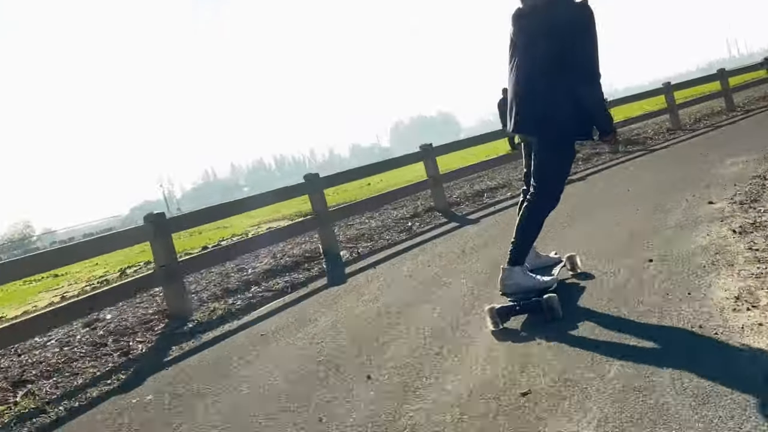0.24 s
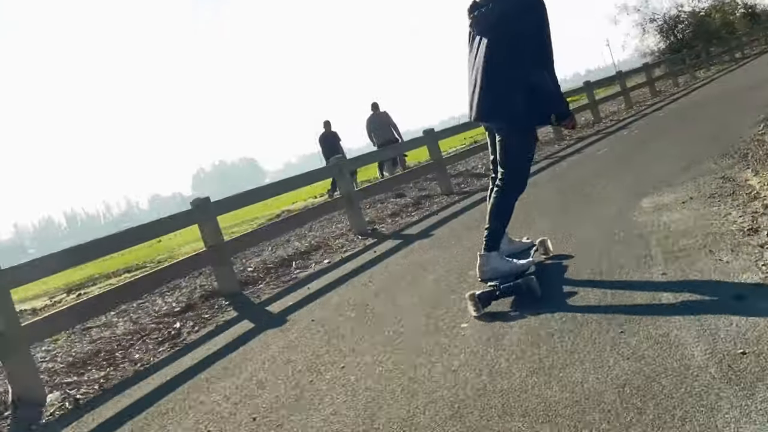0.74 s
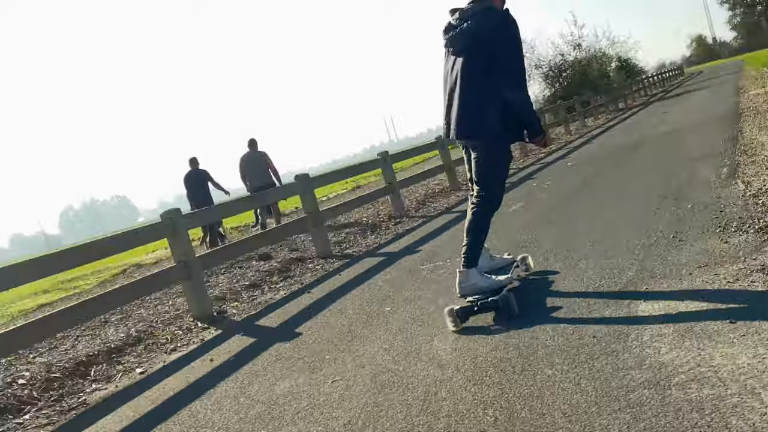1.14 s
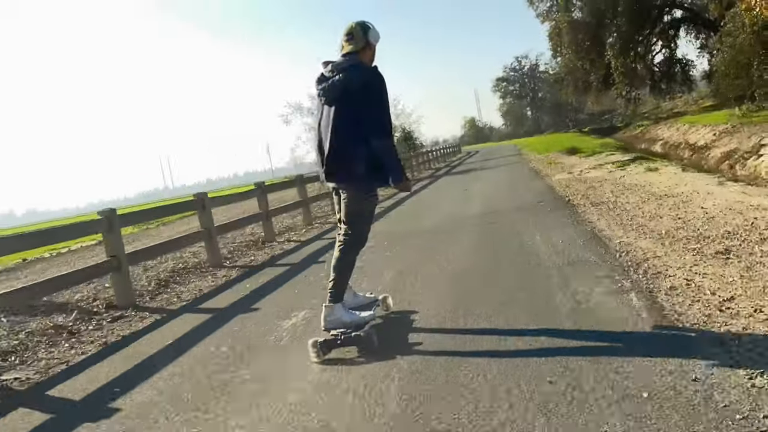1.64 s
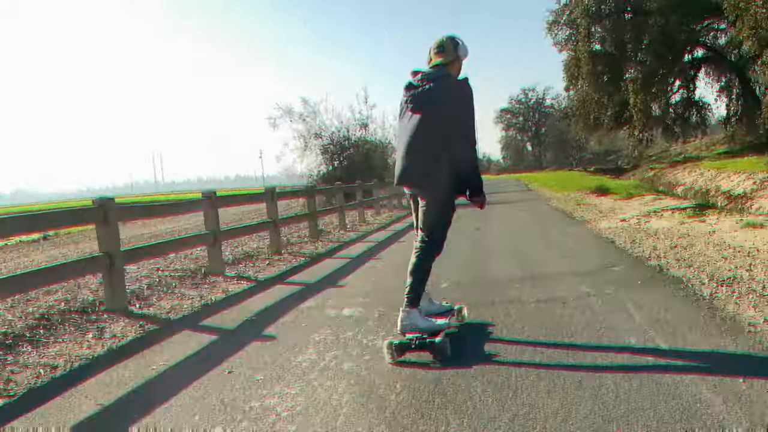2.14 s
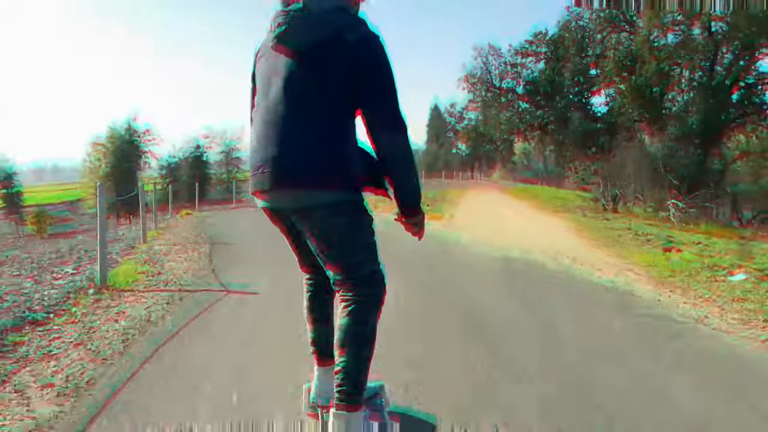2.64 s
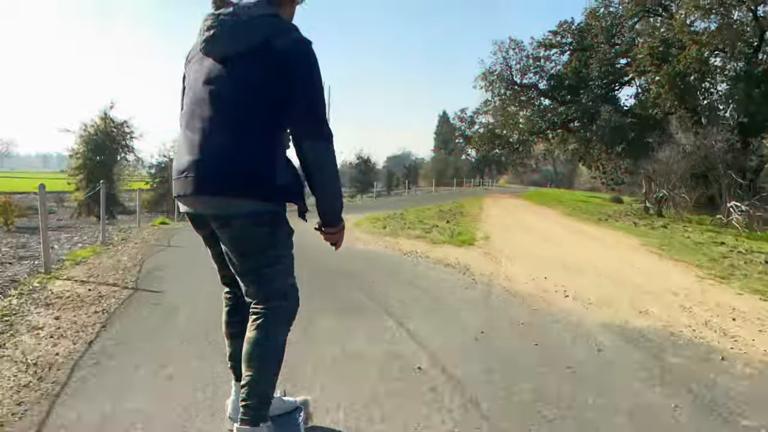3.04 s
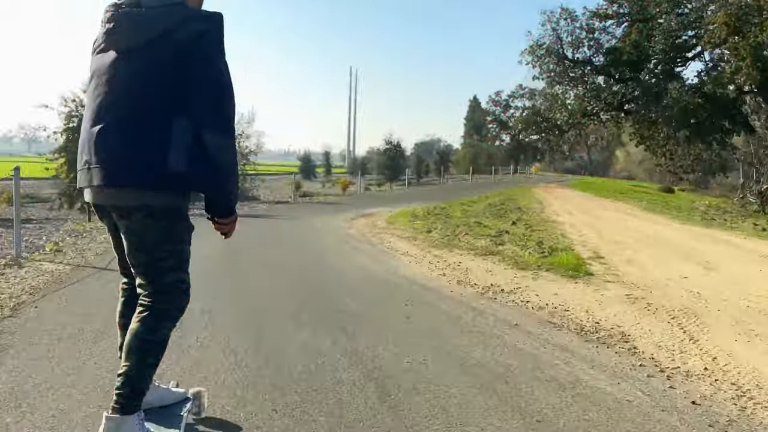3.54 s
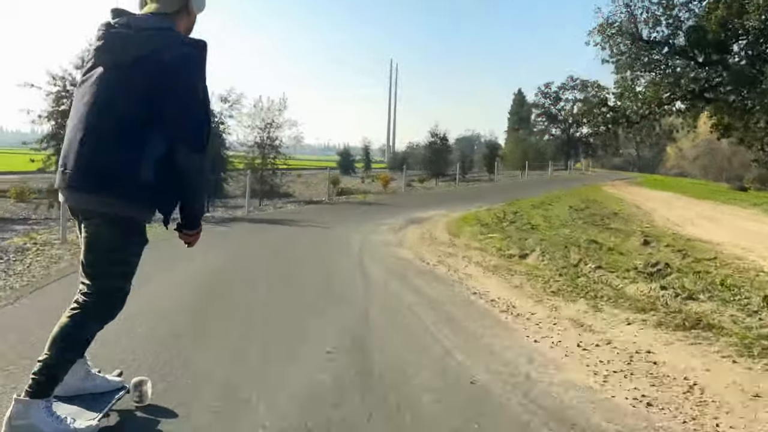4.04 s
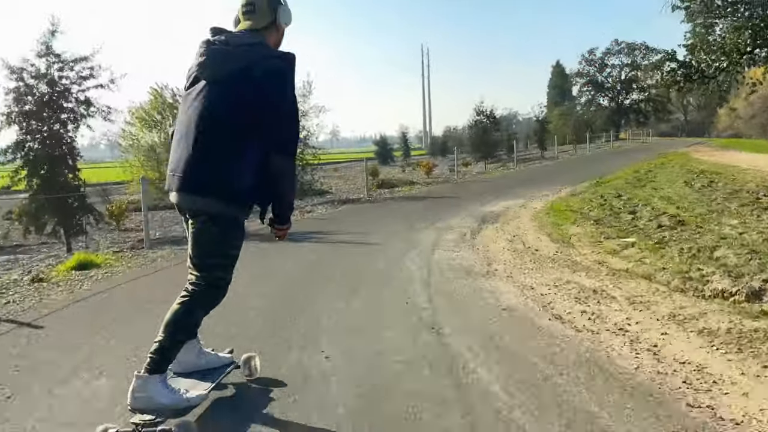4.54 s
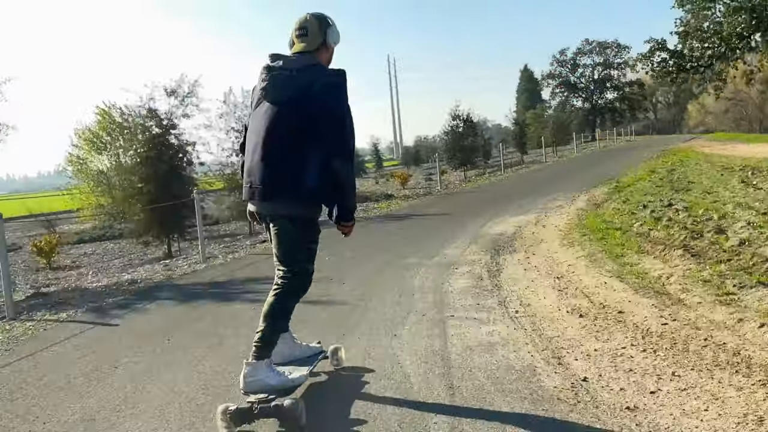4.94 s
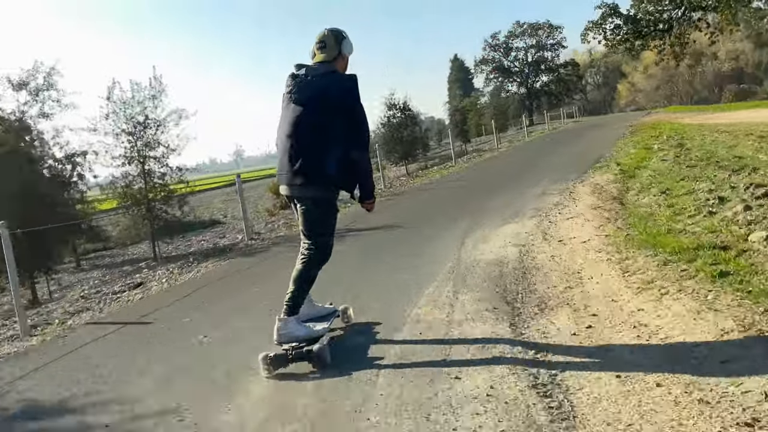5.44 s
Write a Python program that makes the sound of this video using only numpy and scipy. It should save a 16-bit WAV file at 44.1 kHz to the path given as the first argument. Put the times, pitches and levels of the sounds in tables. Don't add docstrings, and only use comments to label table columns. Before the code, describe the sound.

Small wheels roar softly over asphalt with grit ticks and board knocks, while wind thumps the microphone and a faint electric whine rises.

```python
import sys
import numpy as np
from scipy import signal
from scipy.io import wavfile
from scipy.ndimage import uniform_filter1d, minimum_filter1d

SR = 44100
rng = np.random.default_rng(int(sys.argv[2]) if len(sys.argv) > 2 else 0)


def level_to_linear(level):
    exponent = np.asarray(level, float) / 20
    return 10 ** exponent


def unload_audio(sound):
    columns = np.transpose(np.atleast_2d(sound))
    steps = np.round(np.clip(columns, -1, 1) * 32767)
    wavfile.write(sys.argv[1], SR, steps.astype(np.int16))


N = 250929
JOIN_S = 2.164


def rms_one(x):
    return x / np.sqrt(np.mean(x ** 2) + 1e-20)


def in_time(rows):
    s, *columns = np.transpose(rows)
    return [np.interp(np.arange(N) / SR, s, c) for c in columns]


def drift(rate):
    r = np.exp(-20 * np.pi * rate / SR)
    slow = signal.lfilter([1], [1, -2 * r, r * r], rng.standard_normal(N // 10 + 4002))
    slow = rms_one(slow[4000:])
    return np.interp(np.arange(N) / 10, np.arange(len(slow)), slow)


def band(x, low_hz, high_hz):
    return signal.sosfilt(signal.butter(2, [low_hz, high_hz], "band", fs=SR, output="sos"), x)


def at_hz(points, hz):
    points = np.array(points)
    return np.interp(np.log(hz), np.log(points[:, 0]), points[:, 1])


# time in seconds, roar level in dB,
# coarseness of the asphalt as hiss level in dB against the roar.
ROLLING_LEVELS = [(0.0, -44, -6.5), (0.35, -42.5, -9.5), (1.14, -42, -8.5), (1.55, -40, -8.5),
                  (2.15, -38.5, -11.5), (2.17, -38.5, -9.5), (2.63, -37, -6.5), (2.81, -37.5, -7.5),
                  (3.48, -37, -13), (4.09, -36.5, -11.5), (4.44, -35.5, -10), (4.65, -40.5, -8),
                  (5.33, -37, -8), (5.69, -38, -10)]
# frequency in Hz, density in dB per Hz.
ROAD_COLOUR_A = [(88, -33), (150, -3), (184, -11), (342, -6.5), (508, 0.5), (742, -18.5), (843, -5),
                 (1250, -9), (1660, -4), (2080, -14), (2510, -13.5), (3790, -20.5), (6600, -24),
                 (8580, -51), (14500, -120)]
ROAD_COLOUR_B = [(88, -30), (150, -3), (179, -4), (219, -12.5), (440, 0.5), (644, -7.5), (856, -5),
                 (1020, -9.5), (1190, -2), (2180, -9), (2280, -10), (2850, -14), (6600, -16.5), (8580, -54),
                 (14500, -120)]


def rolling(grain_per_s, grain_db, judder_db, patchy_db):
    roar_db, coarse_db = in_time(ROLLING_LEVELS)
    hiss_db = roar_db + coarse_db
    later = np.arange(N) > JOIN_S * SR

    heights = level_to_linear(4.05 * np.minimum(rng.exponential(1, (2, N)), 5))
    stones = heights * rng.choice([-1, 1], (2, N))
    stones = stones * (rng.random((2, N)) < grain_per_s / SR)
    white = rng.standard_normal((2, N)) + level_to_linear(grain_db) * rms_one(stones)

    judder = judder_db * (drift(21) + 0.6 * drift(31))
    edges = 140 * 2 ** np.arange(0, 5.8, .25)
    roar, hiss = np.zeros(N), np.zeros(N)
    for k, (low, high) in enumerate(zip(edges, edges[1:])):
        hz = min(np.sqrt(low * high), 6500)
        colour_db = np.where(later, at_hz(ROAD_COLOUR_B, hz), at_hz(ROAD_COLOUR_A, hz))
        level_db = colour_db + judder + patchy_db * drift(32)
        part = level_to_linear(level_db) * band(white[k % 2], low, high)
        hiss_share = np.clip(np.log2(hz / 2300) / .8, 0, 1)
        roar = roar + (1 - hiss_share) * part
        hiss = hiss + hiss_share * part

    def even(x):
        return np.where(later, x / x[later].std(), x / x[~later].std())

    return level_to_linear(roar_db + 1.5) * even(roar) + level_to_linear(hiss_db - 1.0 + 1.4 * drift(94)) * even(hiss)


def taps(events, width, noisy, snap):
    out = np.zeros(N)
    t = np.arange(round(.05 * SR)) / SR
    puffs = rng.standard_normal((len(events), len(t)))
    for (s, peak_db, hz, t60), puff in zip(events, puffs):
        i = round(s * SR)
        edges = hz / width, min(hz * width, 9000)
        tone = np.sin(2 * np.pi * hz * t) + noisy * rms_one(band(puff, *edges))
        shape = np.minimum(t * hz / 2.8, 1) * level_to_linear(-60 * t / t60)
        click = band(1. * (t == 0), *edges)
        click = click / np.abs(click).max()
        tap = level_to_linear(peak_db + 0.5) * (shape * tone + snap * click)
        out[i:i + len(t)] += tap[:N - i]
    return out


# start in seconds, peak level in dB, pitch in Hz.
GRIT_SNAPS = [(0.1592, -17.5, 6400), (0.373, -21, 4860), (0.3773, -23.5, 4770), (0.4735, -33, 5240),
              (0.6386, -34, 4820), (1.3453, -29.5, 4640), (2.114, -27, 6400), (3.1776, -29.5, 5540),
              (4.6553, -26, 5200), (4.6598, -34.5, 5600), (4.871, -30.5, 4612), (5.5045, -32.5, 5444)]
# start in seconds, peak level in dB, pitch in Hz.
GRIT_SCRATCHES = [(0.32, -42, 6300), (0.3318, -39, 6400), (0.398, -28, 3470), (0.4157, -30.5, 4000),
                  (0.574, -42, 4850), (0.7103, -34.5, 3590), (0.716, -33, 3650), (0.7846, -36, 3800),
                  (0.835, -33, 3700), (1.0054, -32.5, 3800), (1.1645, -32, 3800), (1.2243, -41, 4100),
                  (1.4357, -33, 4220), (1.6836, -36, 4500), (1.7255, -32, 5370), (2.6209, -32, 4870),
                  (3.01, -31.5, 5520), (3.0834, -28, 3590), (3.1264, -30, 3850), (4.6325, -40, 4606),
                  (5.6683, -33.5, 3912)]


def grit():
    snaps = [(*row, 0.0057) for row in GRIT_SNAPS]
    scratches = [(*row, 0.0056) for row in GRIT_SCRATCHES]
    snapping = taps(snaps, width=2.1, noisy=1.3, snap=1.2)
    return snapping + taps(scratches, width=1.6, noisy=1.3, snap=.9)


# start in seconds, peak level in dB, pitch in Hz.
DECK_KNOCKS = [(0.4696, -15, 515), (0.4738, -13, 1220), (0.6404, -16, 1520), (0.6678, -26, 1550),
               (0.7775, -22, 520), (1.028, -37, 442), (1.156, -24, 1610), (1.1633, -24, 1930),
               (1.2251, -18.5, 1500), (2.6978, -17, 1000), (2.7285, -14.5, 1257), (2.7296, -15.5, 1990),
               (2.734, -21, 1302), (2.777, -19.5, 1330), (3.4491, -16.5, 902), (4.611, -12, 1205),
               (5.011, -18, 1000), (5.505, -21, 2590), (5.556, -23, 549), (5.643, -34, 1190)]


def deck():
    t60_s_at_1k, damping = 0.015, 0.95
    knocks = [(s, db, hz, t60_s_at_1k * (1000 / hz) ** damping) for s, db, hz in DECK_KNOCKS]
    return taps(knocks, width=1.44, noisy=0.53, snap=0.33)


def whine(rows, flutter_db, octave_db=-30):
    hz, level_db, waver = in_time(rows)
    t = np.arange(N) / SR
    ends = np.clip(np.minimum(t - rows[0][0], rows[-1][0] - t) / .06 + .01, 0, 1)
    wobble = waver / 100 * (1.637 * drift(252) + 0.19 * drift(22))
    turn = 2 * np.pi * np.cumsum(hz * (1 + wobble)) / SR
    octave = level_to_linear(octave_db) * np.sqrt(np.abs(waver)) * np.sin(2 * turn)
    return ends * level_to_linear(level_db + 3.0 + flutter_db * drift(65)) * (np.sin(turn) + octave)


# time in seconds, shaft tone in Hz.
SHAFT_SPEED = [
    (0.598, 272),
    (1.099, 276.6),
    (1.499, 285),
    (1.801, 293.9),
    (2.16, 303.7),
]
# multiple of the shaft tone, start in seconds, level in dB, waver in %.
SHAFT_ORDERS = [
    (1.0, 1.25, -49.5, .6),
    (1.49, 1.42, -49, 1.1),
    (3.02, .78, -54.5, 0.56),
    (5.95, .6, -49, 4.1),
]


def shaft():
    s, hz = np.transpose(SHAFT_SPEED)
    out = np.zeros(N)
    for multiple, start, db, waver in SHAFT_ORDERS:
        times = [start, *s[s > start]]
        rows = [(at, multiple * np.interp(at, s, hz), db, waver) for at in times]
        out += whine(rows, flutter_db=3.5)
    return out


# time in seconds, motor tone in Hz, motor level in dB,
# level of the belt an octave up in dB.
MOTOR_SPEED = [(2.2, 1236, -67, -62), (2.752, 1198, -65, -57), (3.101, 1194, -63, -52.5),
               (3.45, 1165, -57, -46.5), (3.9, 1174, -57.5, -52.5), (4.21, 1163, -44, -47),
               (4.298, 1206, -40.5, -46), (4.579, 1199, -40.5, -47), (4.75, 1209, -45, -55),
               (5.0, 1247, -44, -48.5), (5.299, 1269, -49, -49.5), (5.69, 1330, -53, -50)]


def motor_and_belt():
    s, hz, motor_db, belt_db = np.transpose(MOTOR_SPEED)
    calm, surge, surge_s, surge_width_s = .33, 3.0, 4.45, .15
    waver = calm + surge * np.exp(-((s - surge_s) / surge_width_s) ** 2)
    motor_waver = np.maximum(calm, .33 * waver)
    motor = whine(np.transpose([s, hz, motor_db, motor_waver]), flutter_db=2.5)
    third = whine(np.transpose([s, 3 * hz, motor_db - 22.5, waver]), flutter_db=0.0)
    belt = whine(np.transpose([s, 2 * hz, belt_db, waver]), flutter_db=4.0, octave_db=-11)
    return motor + third + belt


# start in seconds, end in seconds, pitch in Hz, level in dB, waver in %.
STEADY_TONES = [
    (0, 1.2, 2430, -59, .35),
    (3.595, 4.55, 178, -50, .93),
]


def steady_tones():
    out = np.zeros(N)
    for start, end, hz, db, waver in STEADY_TONES:
        out += whine([(start, hz, db, waver), (end, hz, db, waver)], flutter_db=1.5)
    return out


# time of the peak in seconds, swing level in dB,
# half width in seconds, eddy pitch in Hz.
WIND_GUSTS = [(0.049, -39.5, 0.041, 70.02), (0.243, -22.5, 0.011, 91.86), (0.527, -30, 0.034, 79.93),
              (0.66, -32.5, 0.019, 76), (1.08, -36, 0.0079, 69.6), (1.22, -23.5, 0.018, 72.2),
              (1.551, -27, 0.037, 72.3), (1.759, -24, 0.023, 66.8), (1.85, -22.5, 0.019, 67.1),
              (2.038, -30, 0.023, 70.7), (2.25, -22, 0.0616, 77.92), (2.42, -21.5, 0.028, 76),
              (2.53, -23, 0.045, 84.5), (2.599, -25.5, 0.01, 88.7), (2.675, -18, .025, 81.7),
              (2.78, -23.5, .025, 89.9), (2.932, -28.5, 0.017, 65.45), (3.05, -20, 0.023, 97.4),
              (3.128, -23.5, 0.024, 70.2), (3.417, -17, .028, 87.7), (3.92, -24, 0.018, 61.7),
              (4.139, -33.5, 0.019, 76), (4.646, -19, 0.018, 76.6), (4.821, -20, 0.017, 59.9),
              (4.947, -24, 0.025, 72.73), (5.013, -22, 0.014, 67.9), (5.255, -25.5, .03, 92.5),
              (5.33, -23, .025, 71.4), (5.47, -33, 0.02, 69.4), (5.656, -21, 0.017, 102.6)]


def gusts():
    t = np.arange(0, N + 64, 64) / SR
    s, peak_db, width_s, hz = np.transpose(WIND_GUSTS)[:, :, None]
    breeze_db, breeze_hz, sag_octaves = -44, 76, 0.1752
    x = (t - s) / width_s
    bells = level_to_linear(peak_db) * np.exp(-.5 * x ** 2)
    breeze = level_to_linear(breeze_db + 5 * (t > JOIN_S))
    swing = breeze + bells.sum(axis=0)
    sagging = hz * 2 ** (-sag_octaves * np.clip(x, -2, 2))
    pitch = (breeze * breeze_hz + (bells * sagging).sum(axis=0)) / swing
    swing_db = 20 * np.log10(swing)
    lumps_db = -3.5 + (0.79 - 1) * (swing_db - breeze_db)
    return in_time(np.transpose([t, swing_db, pitch, lumps_db]))


def wind(wander, flutter_db):
    swing_db, hz, lumpy_db = gusts()
    turn = 2 * np.pi * np.cumsum(.85 * hz * np.exp(wander * drift(22.13))) / SR
    swing = np.sin(turn) * level_to_linear(flutter_db * drift(27.0))
    lumps = rms_one(band(rng.standard_normal(N), 26, 140))
    lumps = lumps + 0.18 * rms_one(band(rng.standard_normal(N), 250, 560))
    return level_to_linear(swing_db) * (swing + level_to_linear(lumpy_db + 2.7 * drift(30)) * lumps)


# start in seconds, peak level in dB, start pitch in octaves above the thud.
FAST_EDDIES = [(2.217, -21, 3.14), (2.245, -17.5, 3.7), (2.345, -16.5, 2.95), (2.489, -10, 3.12),
               (2.646, -5, 3.4), (2.695, -13, 3.6), (2.728, -20, 3.8), (2.777, -19.5, 3.1),
               (3.418, -18, 2.72), (3.448, -23.5, 3.18), (4.6084, -14.5, 2.8), (4.644, -16, 2.7),
               (4.802, -25, 2.9), (5.008, -9, 2.8), (5.232, -24.5, 2.95), (5.6415, -11, 2.92)]
# start in seconds, peak level in dB.
SLOW_EDDIES = [(0.224, -28.5), (0.506, -33), (0.531, -30.5), (1.163, -25), (1.179, -23.5), (2.3, -22.5),
               (2.425, -25.5), (2.464, -25), (2.536, -20.5), (2.555, -22), (2.705, -15.5), (2.765, -18.5),
               (3.022, -24.5), (3.045, -22), (3.392, -29), (4.595, -19.5), (4.79, -23), (4.963, -24.5),
               (5.227, -26.5), (5.266, -23), (5.306, -20.5), (5.316, -19), (5.341, -25.5), (5.574, -18)]


def eddies(floor_hz, wander, grit_db):
    out = np.zeros(N)
    rough = np.exp(wander * drift(150))
    ragged = level_to_linear(grit_db) * rms_one(band(rng.standard_normal(N), 470, 730))
    # time of the pitch fall and length, both in seconds
    events = [(*row, 0.00525, 0.019) for row in FAST_EDDIES]
    events += [(*row, 2.19, 0.00692, 0.026) for row in SLOW_EDDIES]
    for s, peak_db, octaves, fall_s, length_s in events:
        i = round(s * SR)
        t = np.arange(min(round(.12 * SR), N - i)) / SR
        here = slice(i, i + len(t))
        fast = 2 ** octaves * np.exp(-(t / fall_s) ** 1.21)
        hz = floor_hz * (1 + fast) * rough[here]
        shape = (1 - np.exp(-t / 0.00029)) * np.exp(-(t / length_s) ** 2)
        swing = np.sin(2 * np.pi * (rng.random() + np.cumsum(hz) / SR))
        out[here] += level_to_linear(peak_db) * shape * (swing + fast / 10 * ragged[here])
    return out


def held(x):
    limit, hold = .19, round(.003 * SR)
    room = minimum_filter1d(limit / np.maximum(np.abs(x), limit), size=2 * hold + 1)
    return x * uniform_filter1d(room, size=hold)


def scene():
    road = rolling(grain_per_s=700, grain_db=-5, judder_db=0.6, patchy_db=0.92)
    bumps = grit() + deck()
    drive = shaft() + motor_and_belt() + steady_tones()
    air = held(wind(wander=.2, flutter_db=2.0) + eddies(floor_hz=67.4, wander=.2, grit_db=-8.0))
    t = np.arange(N) / SR - JOIN_S
    fade_out_s, fade_in_s = 0.65, 0.54
    fade = np.clip(np.where(t < 0, -t / fade_out_s, t / fade_in_s), .004, 1) ** 0.9
    return (fade * (road + bumps + drive + air))[None]


def band_limit(x):
    return signal.sosfilt(signal.butter(12, 8020, fs=SR, output="sos"), x)


def record(dry):
    soft = .3 * np.tanh(dry / .3)
    low_pass = signal.ellip(9, .5, 62, 6880, fs=SR, output="sos")
    mix = signal.sosfilt(low_pass, soft)
    return band_limit(mix)


dry = scene()
out = record(dry)
unload_audio(out)
```